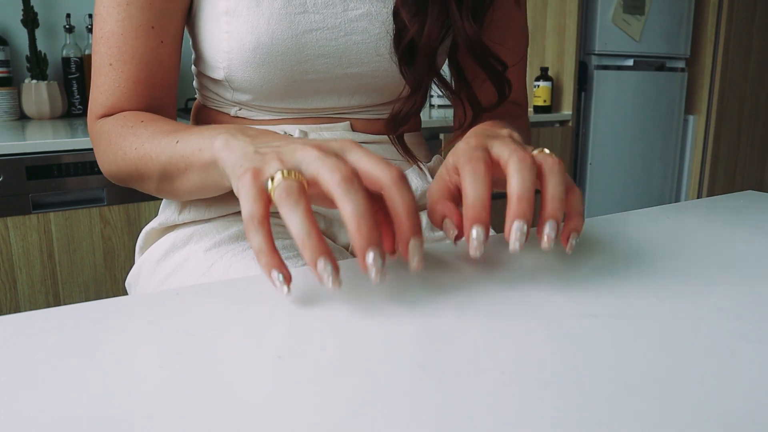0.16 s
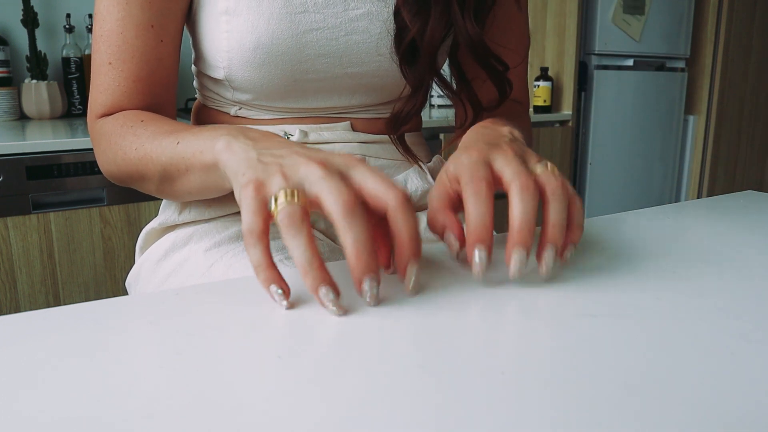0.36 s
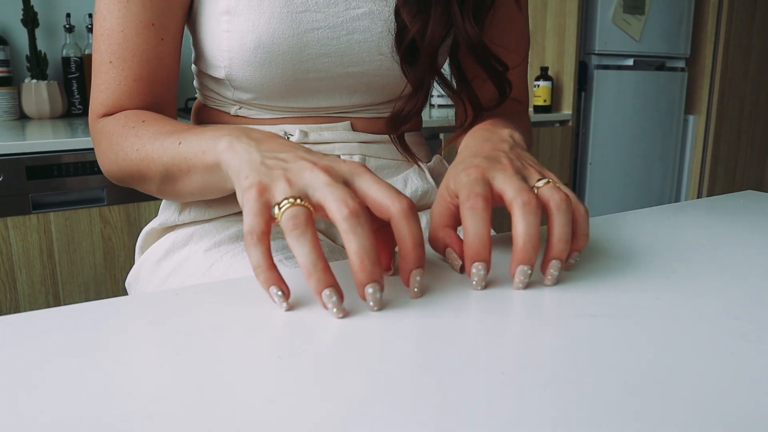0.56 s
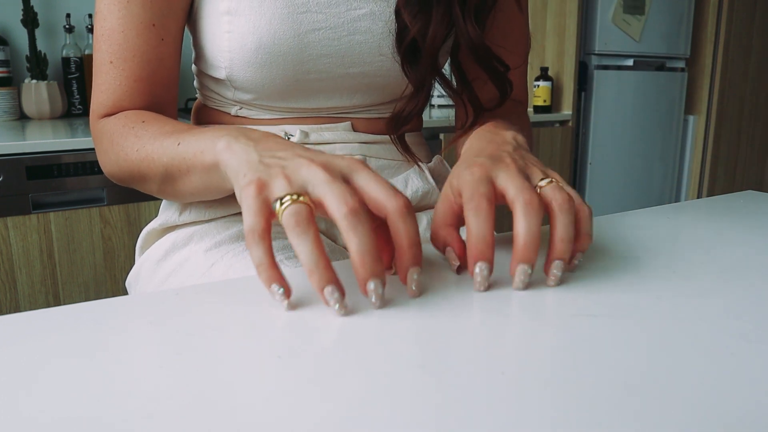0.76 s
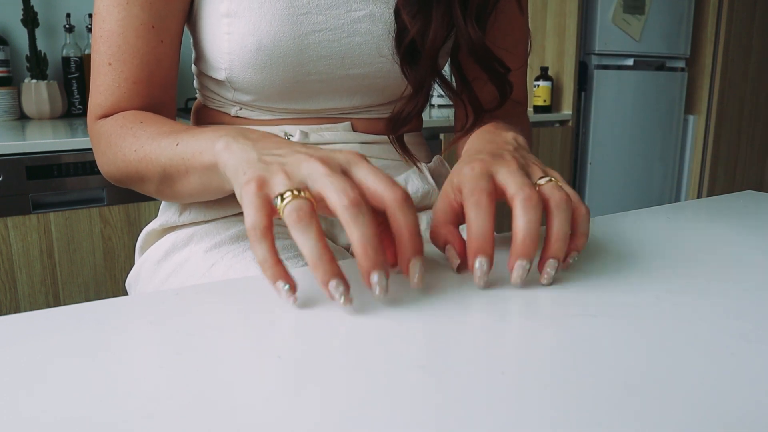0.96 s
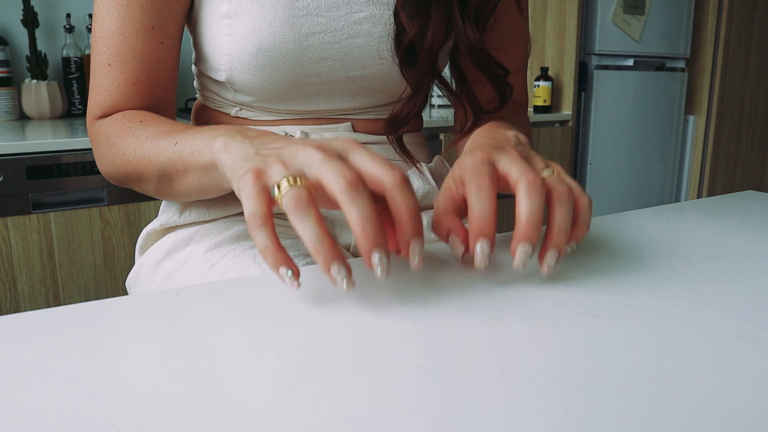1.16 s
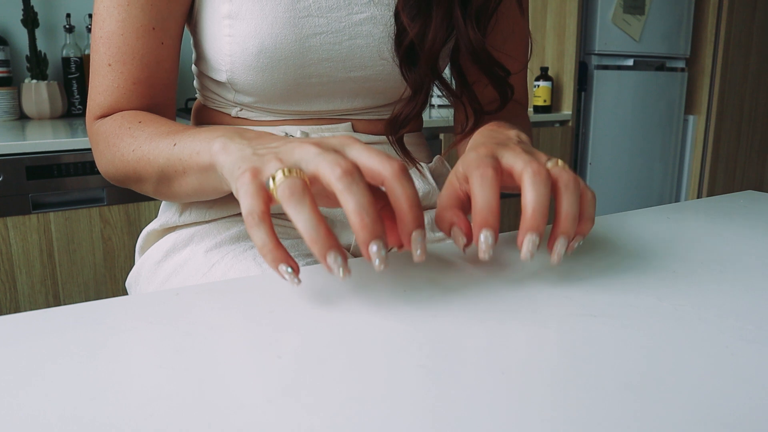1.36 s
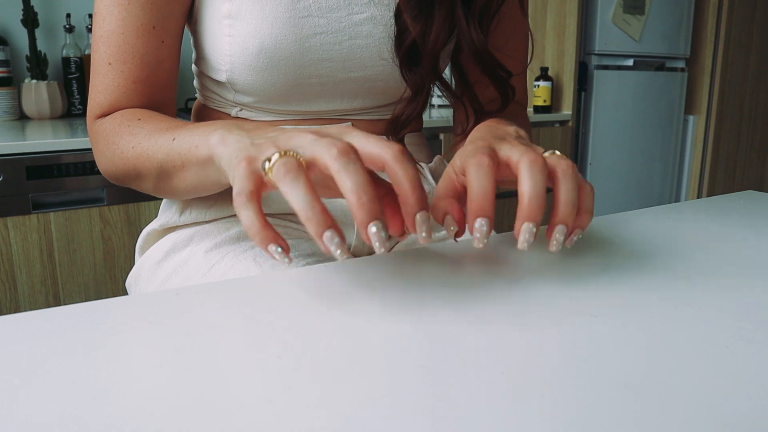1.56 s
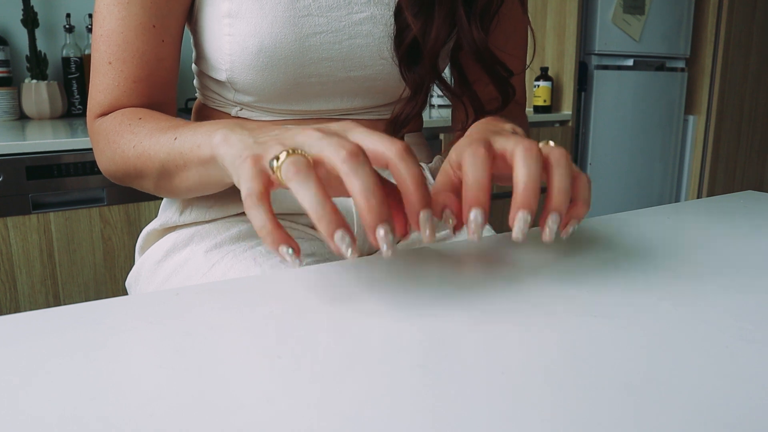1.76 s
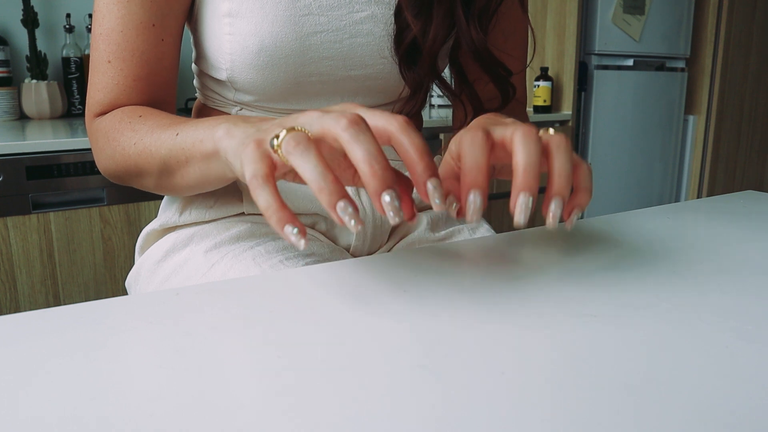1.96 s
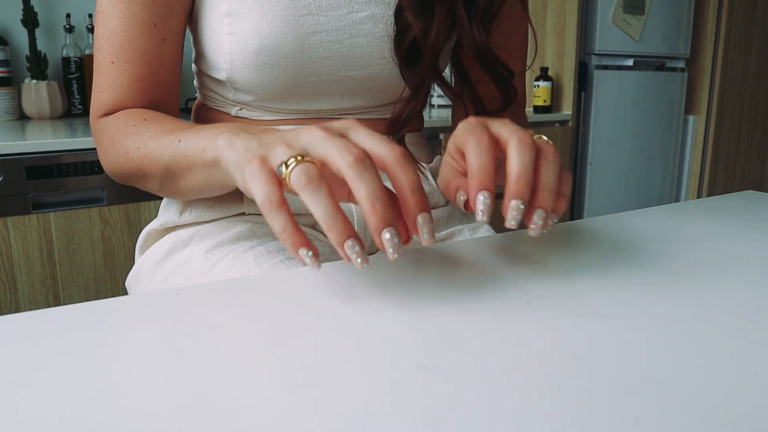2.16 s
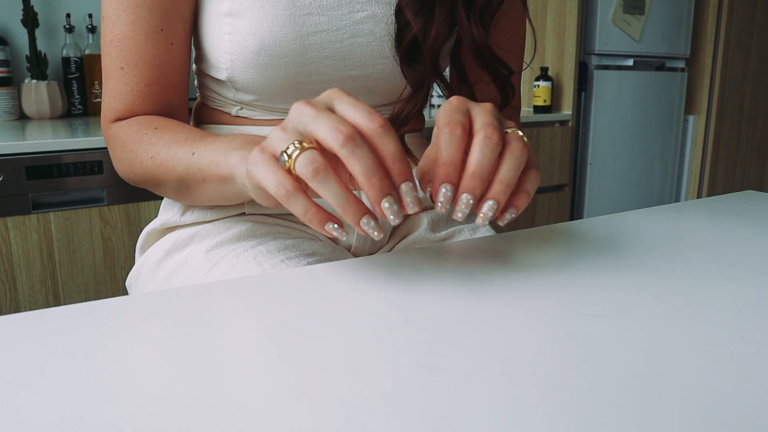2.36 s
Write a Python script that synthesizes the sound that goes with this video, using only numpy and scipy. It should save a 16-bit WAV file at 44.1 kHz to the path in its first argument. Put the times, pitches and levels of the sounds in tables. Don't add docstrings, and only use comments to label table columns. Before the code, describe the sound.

Long fingernails of both hands drum on a hard countertop, steady ragged clusters between five and six a second, each a bright tick with a hollow knock, close to the microphone in a quiet, slightly echoing kitchen.

```python
import sys
import numpy as np
from scipy import signal
from scipy.fft import rfft, irfft
from scipy.io import wavfile

SR = 44100
rng = np.random.default_rng(int(sys.argv[2]) if len(sys.argv) > 2 else 0)


def persist_wave(psi):
    counts = np.round(np.clip(psi, -1, 1) * 32767).astype(np.int16)
    wavfile.write(sys.argv[1], SR, np.atleast_2d(counts).T)


def boost_factor(decibels):
    exponent = np.asarray(decibels, float) / 20
    return 10 ** exponent


N = 106413
LEAD = 4410


def read(points, hz):
    f, value = np.transpose(points)
    return np.interp(np.log(hz + 1), np.log(f + 1), value)


def ring(modes, seconds, detune, scatter_db):
    hz, db, t60 = np.transpose(modes)[:, :, None]
    t = np.arange(round(seconds * SR)) / SR
    level_luck, pitch_luck = rng.standard_normal((2, len(modes), 1))
    fade = boost_factor(db + scatter_db * level_luck - 60 * t / t60)
    return (fade * np.sin(2 * np.pi * hz * (1 + detune * pitch_luck) * t)).sum(0)


def die_away(x, seconds):
    return x * np.exp(-np.arange(len(x)) / SR / seconds)


def high_pass(x, order, edge_hz):
    return signal.sosfilt(signal.butter(order, edge_hz, "high", fs=SR, output="sos"), x)


def weigh(modes, weights):
    return [(hz, db + read(weights, hz), t60) for hz, db, t60 in modes]


def retune(modes, ratio):
    return [(hz * ratio, db, t60) for hz, db, t60 in modes]


# [f/Hz, level per Hz/dB]
HUSH_COLOUR = [(30, 3), (70, -9), (130, -20), (1000, -28), (2500, -37), (12000, -42), (15700, -50),
               (15900, -76)]


def hush():
    level_db = -53
    colour = boost_factor(read(HUSH_COLOUR, np.fft.rfftfreq(N, 1 / SR)))
    x = irfft(rfft(rng.standard_normal(N)) * colour, N)
    return boost_factor(level_db) * x / x.std()


# [f/Hz, time to fall 60 dB/s]
ROOM_FADE = [(100, 0.31), (400, 0.35), (1100, 0.4441), (2900, 0.34), (6000, 0.43), (9000, 0.33),
             (14000, 0.22)]
# [f/Hz, level/dB]
ROOM_LEVEL = [(100, -13.5), (430, -6.5), (640, -12), (1100, -8), (2100, -4.5), (5000, -7.5), (9000, -11.5),
              (14000, -22.5)]


def room(lanes):
    start_s, top_hz = 0.00044, 15780
    taps = rng.standard_normal((3, SR // 2))
    hz, t, z = signal.stft(taps, SR, nperseg=512)
    t60 = read(ROOM_FADE, hz)[:, None]
    fade = boost_factor(read(ROOM_LEVEL, hz)[:, None] - 60 * t / t60)
    even_energy = np.sqrt(2 * np.log(1000) / (t60 * SR))
    tail = signal.istft(z * fade * even_energy, SR, nperseg=512)[1]
    tail = tail * np.clip(np.arange(tail.shape[1]) / SR / start_s - .5, 0, 1)
    wet = signal.fftconvolve(lanes, tail, axes=1)[:, :lanes.shape[1]].sum(0)
    return signal.sosfilt(signal.ellip(10, .5, 70, top_hz, fs=SR, output="sos"), wet)


# [f/Hz, level/dB, time to fall 60 dB/s]
CABINET_RINGS = [(63.5, -25.5, 0.39), (38.5, -26.5, 0.41)]


def cabinet(thud_db):
    rise_s = 0.028
    hum = boost_factor(thud_db) * ring(CABINET_RINGS, .5, .024, 1.5)
    return hum - die_away(hum, rise_s)


# [f/Hz, level/dB, time to fall 60 dB/s]
KNOCK_RINGS = [(960, 1, 0.011), (492.5, -17, 0.11), (631.6, -15, 0.065), (778.3, -10, 0.068),
               (895, -8.5, 0.054), (1047, -16.5, 0.05), (1194.6, -21, 0.15), (419.4, -28, 0.36),
               (570, -13.5, 0.013)]
# [f/Hz, level/dB, time to fall 60 dB/s]
THUD_RINGS = [(136.2, -1.5, 0.11), (262.9, -5.5, 0.088), (169, -2, 0.027)]
# [f/Hz, level/dB, time to fall 60 dB/s]
CLACK_RINGS = [(1360, -4.5, 0.012), (1790, -27, 0.019), (1471, -28, 0.12)]
# [f/Hz, level/dB, time to fall 60 dB/s]
SUSTAIN_RINGS = [(825, -35, 0.3), (1270, -22.5, 0.22), (1580, -28, 0.5), (340, -36, 0.17), (479, -33, 0.47)]


def slab(weights, linger, tick_db, knock_db, thud_db):
    detune, scatter_db, push_s, edge_hz = .006, 1.5, 0.00034, 237
    x = boost_factor(knock_db) * ring(weigh(KNOCK_RINGS, weights), .5, detune, scatter_db)
    x = x + boost_factor(4.5 + thud_db) * ring(weigh(THUD_RINGS, weights), .5, detune, scatter_db / 2)
    x = x + boost_factor(tick_db) * ring(weigh(CLACK_RINGS, weights), .5, 2 * detune, scatter_db)
    x = x + boost_factor(knock_db) * ring(weigh(SUSTAIN_RINGS, weights) + [linger], .5, 0, 0)
    t = np.arange(64) / SR
    push = np.exp(-.5 * ((t - 2 * push_s) / (push_s / 2)) ** 2)
    pushed = signal.oaconvolve(x, push / push.sum())[16:16 + len(x)]
    return high_pass(pushed, 2, edge_hz)


# [f/Hz, level/dB, time to fall 60 dB/s]
LOW_NAIL_RINGS = [(4310, 8, 0.0019), (4840, 0, 0.0089), (5240, 7.5, 0.0022)]
# [f/Hz, level/dB, time to fall 60 dB/s]
HIGH_NAIL_RINGS = [(6750, -13.5, 0.017), (7196, 10, 0.0021), (8350, -1.5, 0.0081), (11300, -1, 0.0026),
                   (12430, -7, 0.0039), (15400, -53, 0.0041)]


def nail(ratio, tick_db, bright_db):
    detune, scatter_db, edge_hz = 0.037, -4, 4135
    low = ring(retune(LOW_NAIL_RINGS, ratio), .02, detune, scatter_db)
    high = ring(retune(HIGH_NAIL_RINGS, ratio), .02, detune, scatter_db)
    tick = boost_factor(-bright_db / 2) * low + boost_factor(bright_db / 2) * high
    tick = high_pass(tick, 3, edge_hz)
    return -boost_factor(2 + tick_db) * tick / abs(tick).max()


def strike(weights, linger, ratio, tick_db, bright_db, knock_db, thud_db):
    edge_s, body_s, dip_hz, dip_q = 0.00014, 0.0091, 381, 4.03
    tick = nail(ratio, tick_db, bright_db)
    edge = die_away(tick, edge_s)
    edge = edge * tick.std() / edge.std()
    low = slab(weights, linger, tick_db, knock_db, thud_db) + cabinet(thud_db)
    body = die_away(low, body_s)
    low = signal.lfilter(*signal.iirnotch(dip_hz, dip_q, SR), low)
    pad = (0, len(low) - len(tick))
    return low + np.pad(tick, pad), body + np.pad(edge, pad)


# [t/s, second thud level/dB, low knock level/dB, hollow knock level/dB, middle knock level/dB]
LOW_SPOTS = [(-.05, -4, -8.5, 1, -0.5), (.13, 3.5, 0, -1, -2), (.31, -1, 7, 1.5, 2),
             (.49, -2, 4.5, -21, -2.5), (.66, 1, 0.5, 2.5, -15), (.85, -2, -1, 3, 4.5),
             (1.03, -2.5, 2, 1, 5), (1.21, 2, -2.5, 8, -1.5), (1.39, -0.5, 1.5, -3, 1.5),
             (1.56, -0.5, -1.5, 3.5, 0), (1.75, -7.5, -1, 1, -0.5), (1.93, 3, -2.5, -4, -2.5),
             (2.12, -1, 0.5, 1, 1)]
# [t/s, main knock level/dB, upper knock level/dB, top knock level/dB, clack level/dB]
HIGH_SPOTS = [(-.05, -2, 5, 7.5, 1), (.13, -3, -7, -2, 0.5), (.31, 1.5, -4.5, -3, -1),
              (.49, -0.5, 1.5, -7, -5.5), (.66, 3, 3, -0.5, -1.5), (.85, 0.5, -5, -8, -2.5),
              (1.03, -4.5, -8, 7, -2.5), (1.21, 2.5, -8, 0, -5), (1.39, -1.5, 4, 4, -1.5),
              (1.56, -1, 5, -1.5, -7), (1.75, -1.5, -3.5, 1, 0.5), (1.93, 1, 3.5, -1.5, 0.5),
              (2.12, -3, 0, -1, 5)]
SPOT_PITCHES = [150, 265, 460, 610, 780, 930, 1060, 1200, 1400]
# [t/s, ring f/Hz, ring level/dB, nail f/Hz]
HANGING_RINGS = [(-.05, 1050, -24, 5070), (.13, 1740, -23, 4980), (.31, 1210, -34, 5040),
                 (.49, 1039, -22.5, 4990), (.66, 1265, -24, 4990), (.85, 717, -22, 4957),
                 (1.03, 1260, -18, 5067), (1.21, 1247, -29, 5035), (1.39, 751, -27, 4930),
                 (1.56, 616, -26, 5020), (1.75, 692, -24, 5040), (1.93, 1157, -29.5, 4970),
                 (2.12, 1690, -21, 5000)]


def spot(s):
    linger_t60, usual_nail_hz = 0.31, 5000
    k = max(k for k, row in enumerate(LOW_SPOTS) if row[0] <= s + .004)
    levels = (0, *LOW_SPOTS[k][1:], *HIGH_SPOTS[k][1:])
    _, hz, db, nail_hz = HANGING_RINGS[k]
    return list(zip(SPOT_PITCHES, levels)), (hz, db, linger_t60), nail_hz / usual_nail_hz


# [t/s, tick level/dB,
# brightness level/dB, knock level/dB, thud level/dB]
NAIL_STRIKES = [(0.1383, -12, 2, -32, -33), (0.143, -26.5, 0, -34, -43), (0.1446, -10, 2, -48, -19),
                (0.1459, -6, -1.5, -11, -22.5), (0.1465, -4, -6, -16, -15.5), (0.149, -1.5, 0, -16.5, -13.5),
                (0.3147, -16, 13, -29.5, -31), (0.322, -11, -5, -15, -20.5), (0.3237, -3, 2, -14, -8.5),
                (0.3335, -4, 4, -8.5, -17.5), (0.3354, -13, -9, -17.5, -52), (0.3361, -5.5, -2, -8.5, -15.5),
                (0.3387, -3.5, 12, -12.5, -25), (0.3402, -10, -1, -41, -32), (0.4943, -21, 4, -18.5, -28),
                (0.4968, -6.5, 5, -11, -21), (0.4994, -7, 0, -7.5, -13.5), (0.5021, -7.5, 3, -3.5, -15.5),
                (0.5066, -12, 7, -13, -47), (0.5082, -6.5, -3, -14, -38), (0.5091, -7.5, -1.5, -5.5, -18),
                (0.5102, -7, 7, -8.5, -33),
                (0.6707, -25, 4, -28, -38), (0.6732, -6, 1, -6, -19), (0.676, -9.5, -3, -13, -17),
                (0.6809, -10, -4, -11, -11.5), (0.8533, -27, 3, -30, -33), (0.8554, -17, 0, -26, -48),
                (0.8563, -5.5, 2.5, -10, -11.5), (0.8584, -12, 9, -23, -26), (0.859, -10.5, 1, -9.5, -13.5),
                (0.861, -4.5, 5, -7.5, -14.5), (0.8626, -18, 9, -43, -37), (1.0389, -32, -6, -26, -38),
                (1.0416, -19, 7, -29, -55), (1.0448, -9.5, -6, -5.5, -17.5),
                (1.0459, -37, 16, -13.5, -22.5), (1.0469, -5.5, -4, -7, -13), (1.0475, -12, -6, -32, -43),
                (1.2136, -20, 7, -33, -32), (1.2188, -18.5, 1, -21.5, -26.5), (1.22, -15, 13, -15.5, -16.5),
                (1.221, -10, -3.5, -13.5, -25), (1.2238, -7.5, -0.5, -6, -13),
                (1.2252, -13.5, 10, -45, -43), (1.226, -8.5, -2, -12.5, -40),
                (1.3965, -22.5, 10, -32, -37), (1.4033, -22, -12, -11, -20), (1.4047, -9, -4, -13.5, -18.5),
               (1.4127, -29, 6, -40, -29), (1.4151, -7, 0.5, -12.5, -23), (1.4177, -6, 4.5, -14.5, -18),
               (1.5662, -28, 9, -30, -36), (1.5736, -12.5, -7, -10.5, -20), (1.5752, -12, -2, -13.5, -19),
               (1.5846, -17, 0, -32, -32), (1.5875, -8.5, 6, -9.5, -19), (1.5886, -4.5, 2.5, -9.5, -16),
               (1.5897, -14.5, -6, -19, -53), (1.7557, -22, 11, -20, -27), (1.7594, -4, 12, -7.5, -18.5),
               (1.7606, -5.5, 6, -8, -25), (1.7622, -16, 15, -16, -40), (1.7659, -10.5, 2, -6.5, -15.5),
                (1.9377, -5, 5, -11, -23.5), (1.9394, -26.5, -4, -42, -24), (1.9419, -7, 9, -8.5, -18),
              (1.9436, -20, 10, -28, -48), (1.9444, -14, 0, -11, -23), (1.9462, -11, -4, -13, -20.5),
              (2.1337, -1, 14, -14.5, -10.5), (2.1345, -3, 10, -25, -29), (2.135, -3, 14, -10.5, -39),
              (2.1469, -26, 11, -43, -18), (2.1488, -5.5, 2, -6, -44), (2.1491, -22, 11, -42, -16.5),
                (-.045, -1.5, 10, -2, -36),
    (-.036, -3, -21, -3, -11),
    (.147, -11.5, -24, -52, -17.5),
    (.1486, -6, 20, -9, -44),
    (2.1498, -3.5, 7, -11, -18),
    (2.348, -43.5, -9, -49, -57),
]


def hands():
    near = np.zeros(N + LEAD + SR)
    lanes = np.zeros((3, N + LEAD + SR))
    strikes = NAIL_STRIKES
    for k, (s, *levels) in enumerate(strikes):
        direct, spill = strike(*spot(s), *levels)
        at = LEAD + round(s * SR)
        near[at:at + len(direct)] += direct
        lanes[k % 3, at:at + len(spill)] += spill
    return near, lanes


def scene():
    near, lanes = hands()
    drumming = (near + room(lanes))[LEAD:LEAD + N]
    return (drumming + hush())[None]


def roll_off(x):
    return signal.sosfilt(signal.butter(12, 16830, fs=SR, output="sos"), x)


def record(dry):
    ceiling, top_hz = 1.37, 16400
    ring_hz, ring_db, ring_s = 12185, -63, 0.012
    x = ceiling * np.tanh(dry / ceiling)
    x = signal.oaconvolve(x, signal.firwin(255, top_hz, window=("kaiser", 9), fs=SR)[None], "same")
    t = np.arange(-2000, 2001) / SR
    ringing = boost_factor(ring_db) * np.exp(-abs(t) / ring_s) * np.cos(2 * np.pi * ring_hz * t)
    x = x + signal.oaconvolve(x, ringing[None], "same")
    return roll_off(x)


dry = scene()
out = record(dry)
persist_wave(out)
```